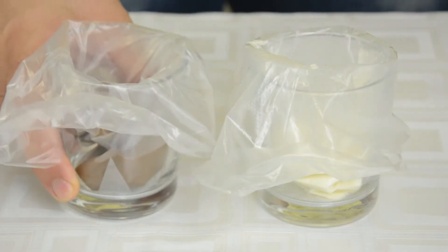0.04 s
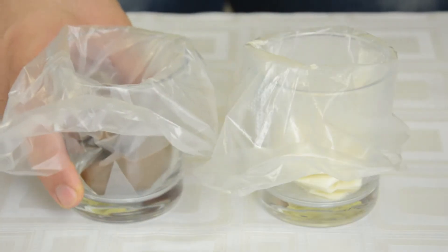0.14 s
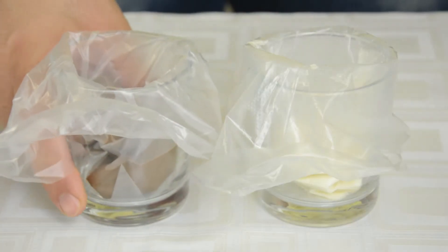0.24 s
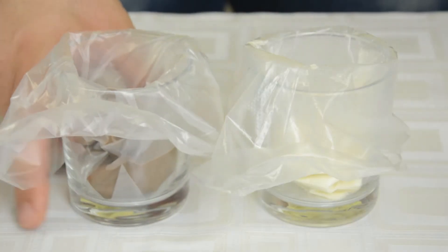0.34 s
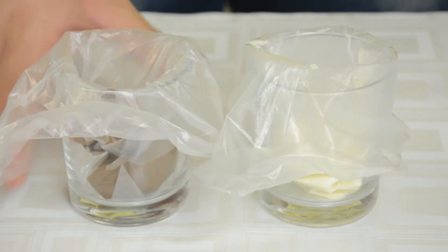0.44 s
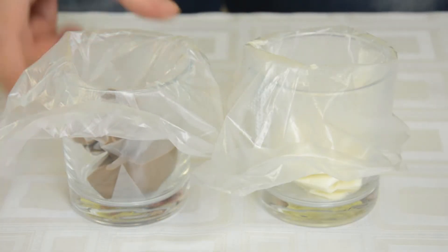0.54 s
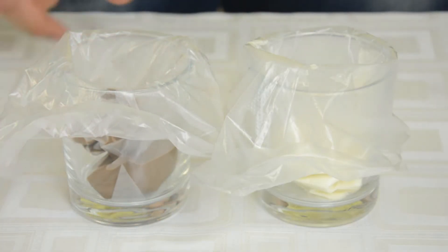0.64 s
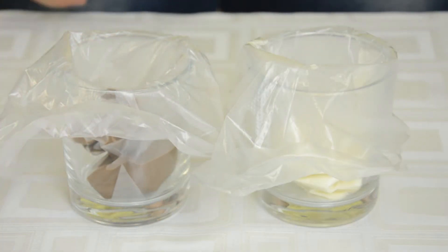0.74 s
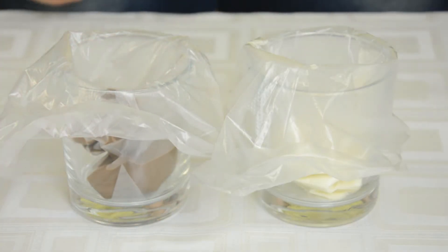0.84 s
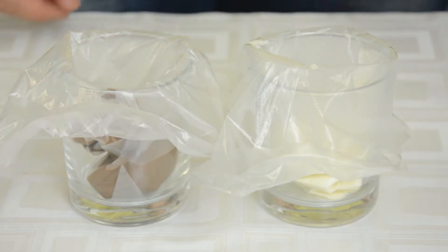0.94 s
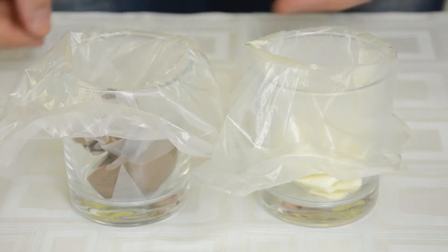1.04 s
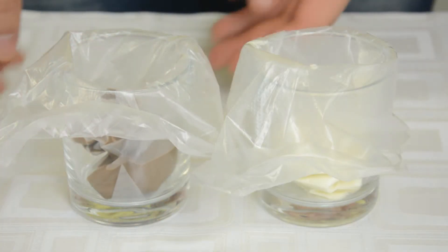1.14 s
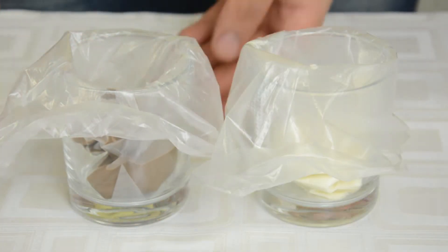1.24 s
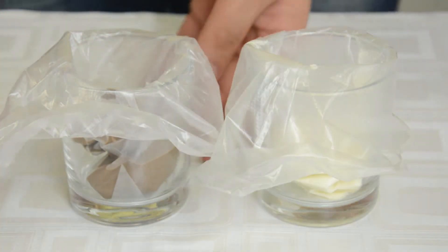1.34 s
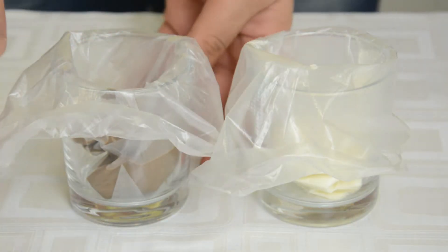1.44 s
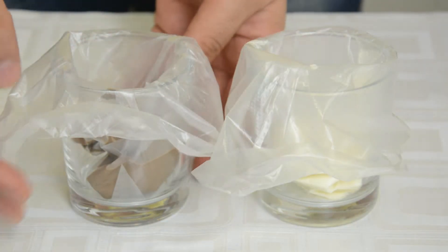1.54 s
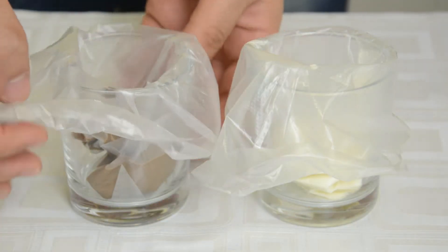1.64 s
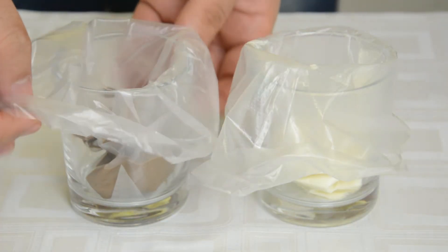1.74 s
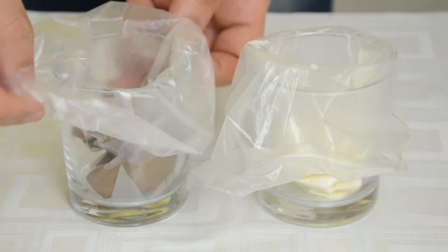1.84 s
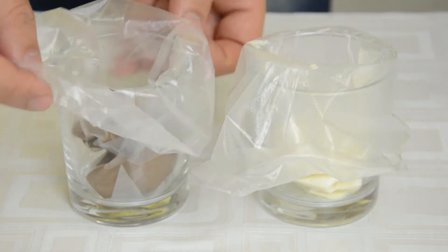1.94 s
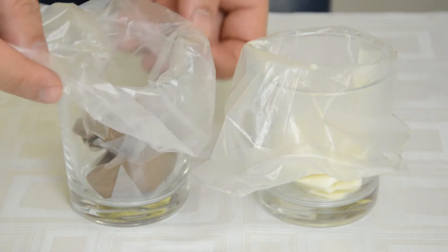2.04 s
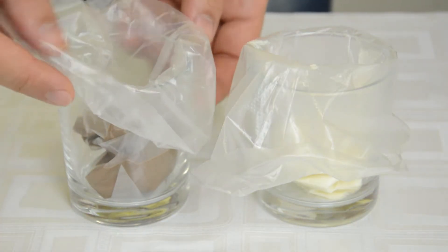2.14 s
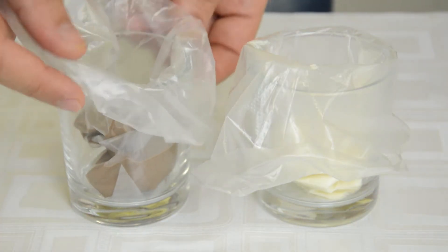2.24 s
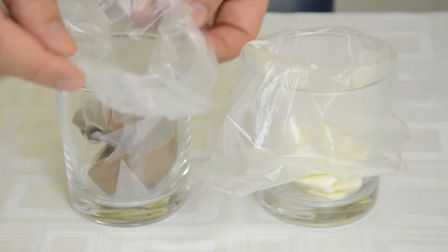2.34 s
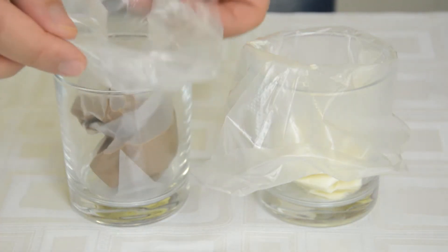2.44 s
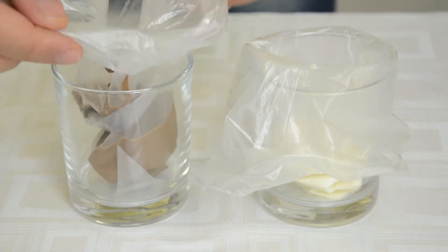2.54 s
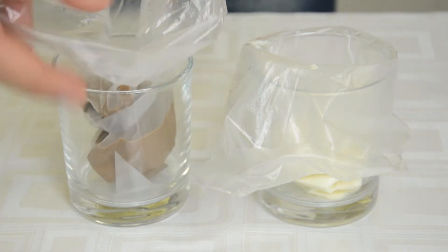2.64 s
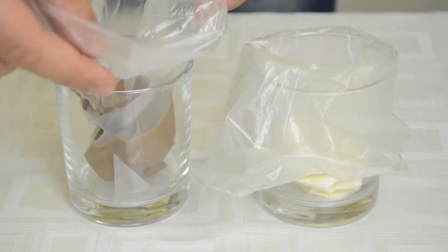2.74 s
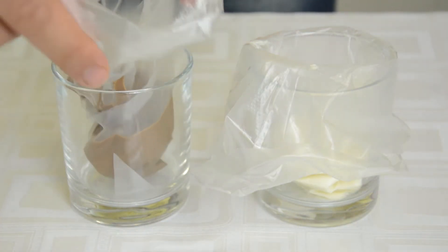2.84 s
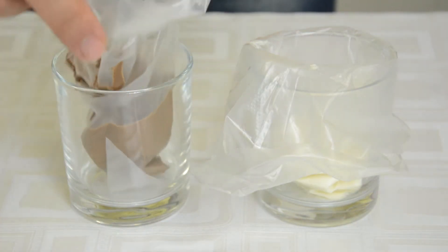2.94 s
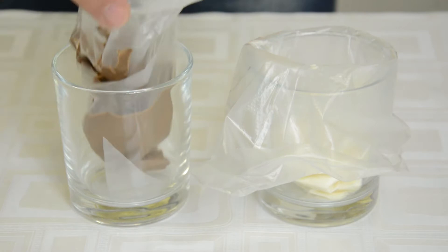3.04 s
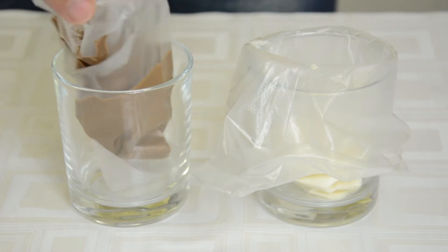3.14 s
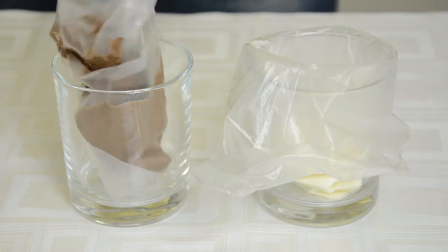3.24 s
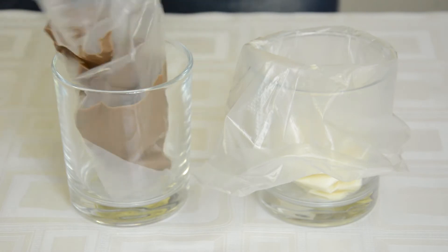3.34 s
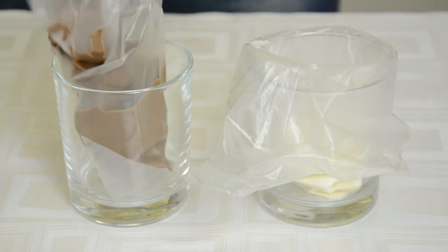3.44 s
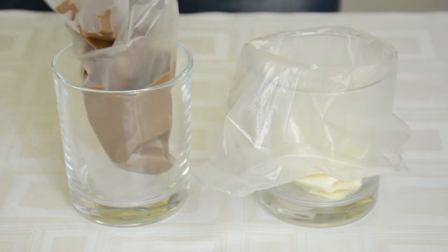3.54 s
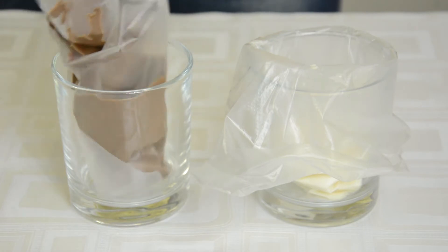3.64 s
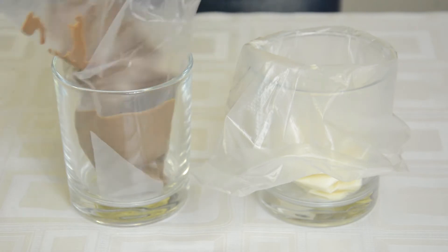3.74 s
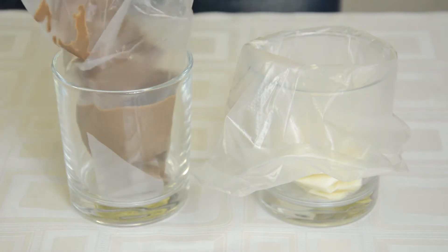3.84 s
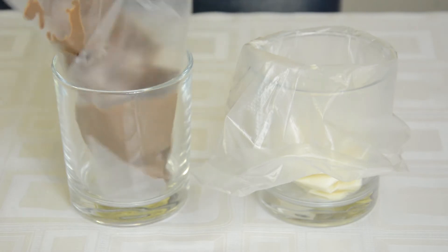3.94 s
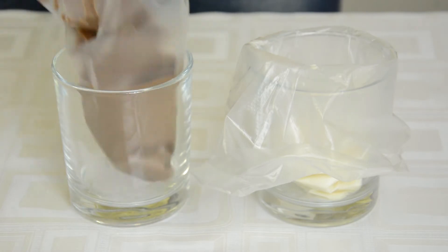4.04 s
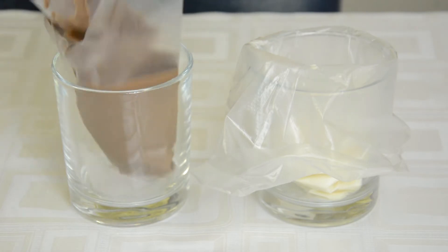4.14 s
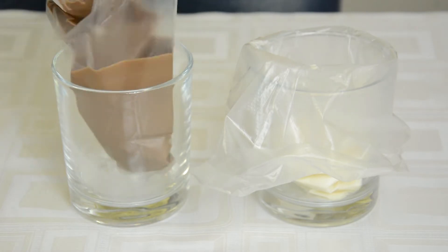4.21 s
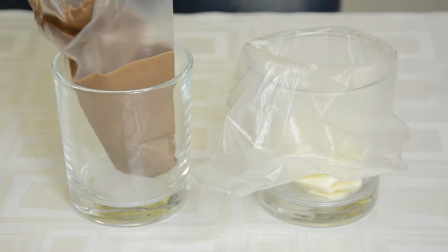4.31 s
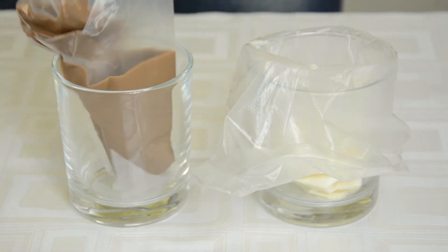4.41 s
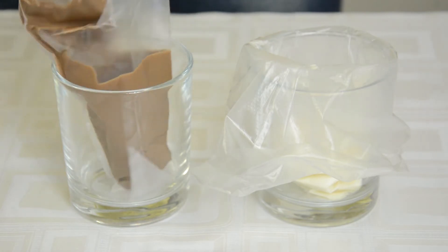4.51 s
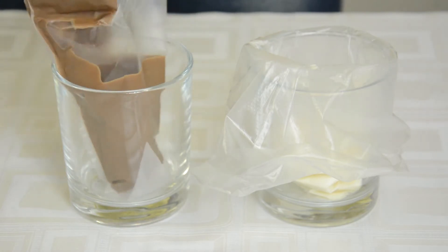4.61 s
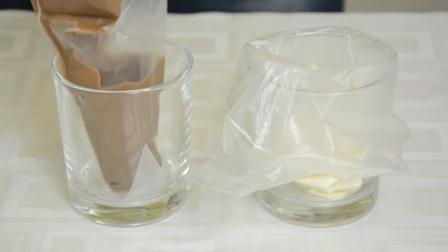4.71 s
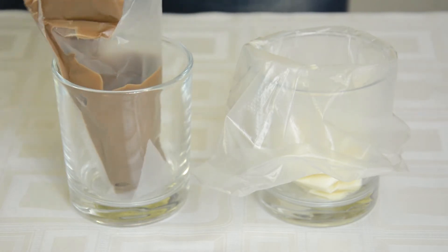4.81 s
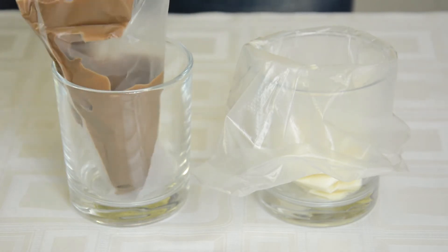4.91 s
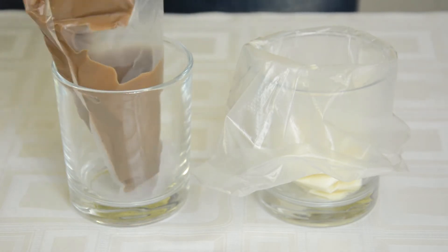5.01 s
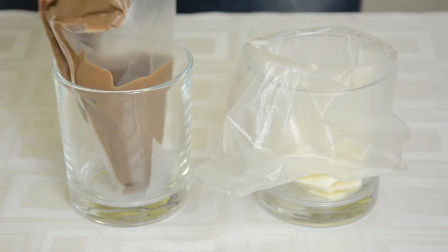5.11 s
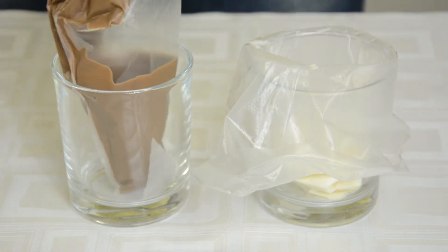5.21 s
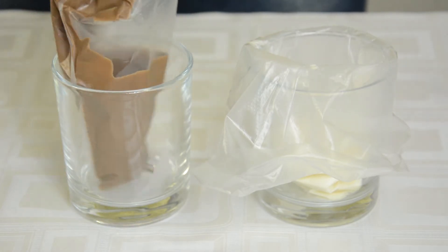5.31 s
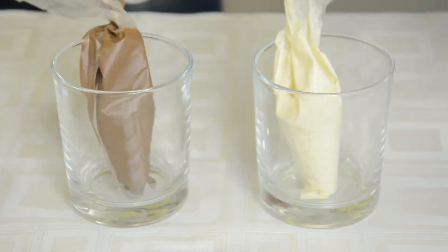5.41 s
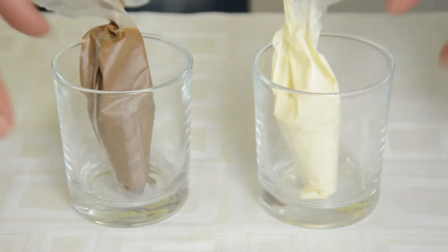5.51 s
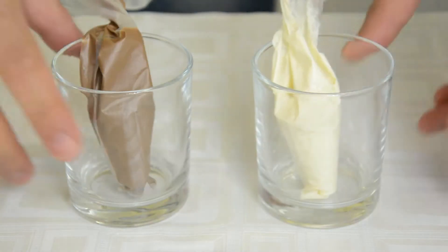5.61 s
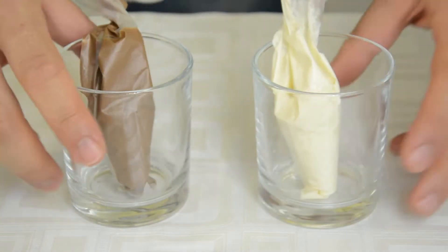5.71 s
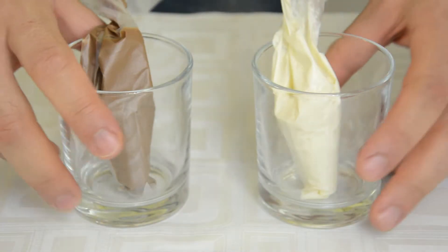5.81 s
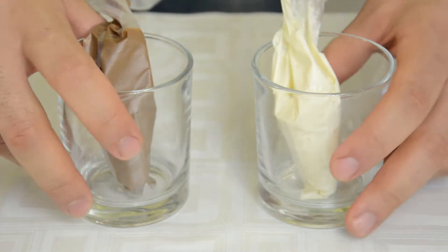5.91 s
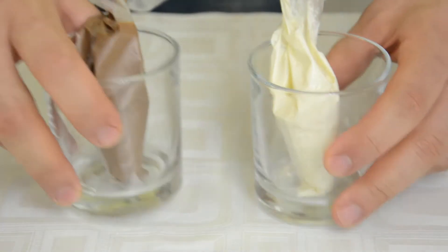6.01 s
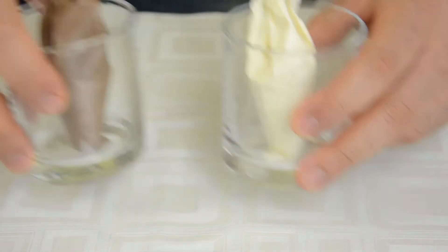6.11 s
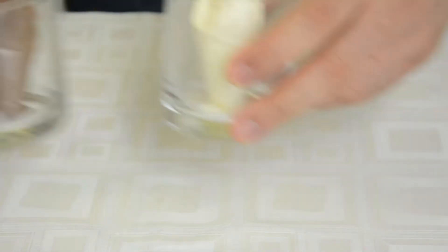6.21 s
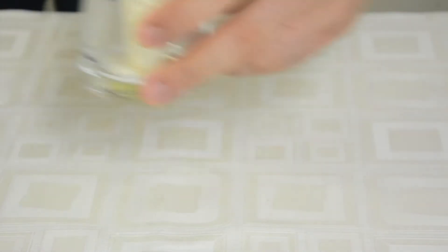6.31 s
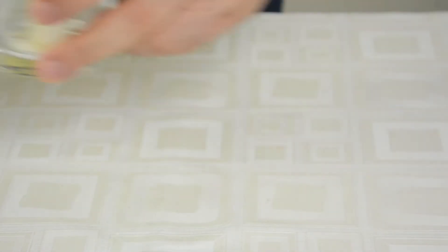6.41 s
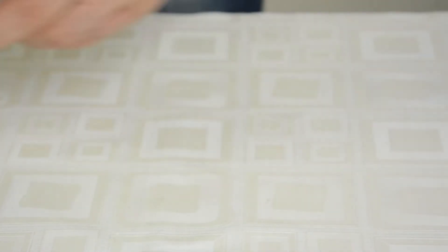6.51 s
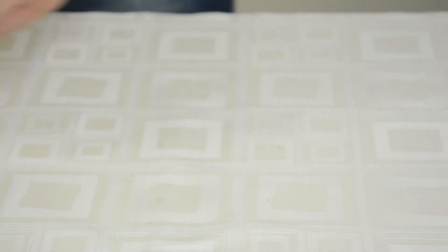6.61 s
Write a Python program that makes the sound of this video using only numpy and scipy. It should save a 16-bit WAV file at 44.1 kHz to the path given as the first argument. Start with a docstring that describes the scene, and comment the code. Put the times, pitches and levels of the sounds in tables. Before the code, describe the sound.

A thick drinking glass is set down on a cloth-covered table with a quick cluster of dull knocks and a brief, damped clink. Fingers rustle thin plastic. After a quiet second, the film is pulled off in tugs, crackling densely with sharp snaps and a slightly hollow glass-like colour. It stops suddenly; a few brushes and a soft thump follow. Close stereo microphone in a quiet kitchen with faint hum.

```python
"""Thin plastic film crinkles densely: clustered buckling clicks, pings and ticks from filtered noise, swelling in tugs.
Larger creases snap through over it as needles and short noise cracks with a note each.
Fingers brush film and glass as grainy noise swishes. Thick drinking glasses meet a clothed table:
modal thuds of the table top and brief modal clinks of the glass wall.
A quiet room of coloured noise and soft hum lies underneath and sinks during the crinkling."""
import sys
import numpy as np
from scipy import signal
from scipy.fft import rfft, irfft
from scipy.io import wavfile
from scipy.ndimage import uniform_filter1d

SR = 44100
rng = np.random.default_rng(int(sys.argv[2]) if len(sys.argv) > 2 else 0)


def master_out(mix):
    """Clip the mix to full scale and print it as 16-bit PCM to the path in sys.argv[1]."""
    frames = np.transpose(np.atleast_2d(mix))
    ceiling = np.clip(frames, -1, 1)
    pcm = np.round(ceiling * 32767).astype(np.int16)
    wavfile.write(sys.argv[1], SR, pcm)


N = 293706
T = np.arange(N) / SR
BAND_TOP_HZ = SR / 2 - 1  # leaves the top open


def undb(db):
    """Decibels to gain."""
    return 10 ** (np.asarray(db) / 20)


def unit(x):
    """Scale to rms 1."""
    return x / np.sqrt(np.mean(x ** 2))


def curve(rows):
    """(time_s, value) rows joined by straight lines."""
    rows = np.array(rows)
    return np.interp(T, rows[:, 0], rows[:, 1])


def add(track, start_s, sound):
    """Mix a sound into a track at start_s."""
    i = max(int(start_s * SR), 0)
    track[..., i:i + sound.shape[-1]] += sound[..., :N - i]


def colour(x, points, size=2048):
    """Minimum-phase filter with the gain of (freq_hz, gain_db) points."""
    freq_hz, gain_db = np.transpose(points)
    f = np.maximum(np.fft.rfftfreq(size, 1 / SR), 1)
    log_gain = np.log(undb(np.interp(np.log(f), np.log(freq_hz), gain_db)))
    # folding the cepstrum onto positive times makes the filter causal
    cepstrum = irfft(log_gain)
    cepstrum[1:size // 2] *= 2
    cepstrum[size // 2 + 1:] = 0
    response = irfft(np.exp(rfft(cepstrum)))
    return signal.fftconvolve(x, response[None], axes=1)[:, :x.shape[1]]


def band(x, lo_hz, hi_hz, order=2):
    """Band-pass filter."""
    sos = signal.butter(order, [lo_hz, hi_hz], "band", fs=SR, output="sos")
    return signal.sosfilt(sos, x)


def fade(t, t60_s):
    """Exponential decay, 60 dB down at t60_s."""
    return np.exp(-np.log(1000) * t / t60_s)


def noise(size):
    """White mid and side noise."""
    return rng.standard_normal((2, size))


def resonance(freq_hz, width_hz):
    """Mid and side noise in one narrow resonance, rms 1."""
    return unit(band(noise(N), freq_hz - width_hz / 2, freq_hz + width_hz / 2, order=1))


def hiss(spectrum, tilt_db_per_oct, size):
    """Mid and side noise of rms 1 with a spectrum tilted about 1 kHz."""
    tilted = [(hz, db + tilt_db_per_oct * np.log2(hz / 1000)) for hz, db in spectrum]
    return unit(colour(noise(size), tilted))


def ring(modes, size=22050):
    """Struck body: a sum of decaying sine modes."""
    t = T[:size]
    return sum(undb(db) * fade(t, t60_s) * np.sin(2 * np.pi * hz * t) for hz, db, t60_s in modes)


def reflect(x, wet_db, t60_s, gap_s):
    """The sound plus a diffuse tail of reflections that starts after gap_s."""
    t = T[:SR // 2]
    tail = noise(len(t)) * fade(t, t60_s) * (t > gap_s)
    tail /= np.sqrt(np.sum(tail ** 2, axis=1, keepdims=True))
    return x + undb(wet_db) * signal.fftconvolve(x, tail, axes=1)[:, :N]


def wander(rate_hz):
    """Smooth random motion with rms 1."""
    hold = int(SR / rate_hz)
    steps = np.repeat(rng.standard_normal(N // hold + 1), hold)
    return unit(uniform_filter1d(steps, hold)[:N])


def with_note(sound, note_hz, note_db, width_ratio=0.13):
    """Let one broad resonance of the sheet stand out of a noise; rms 1."""
    edge = 1 + width_ratio / 2
    note = unit(band(sound, note_hz / edge, note_hz * edge, order=1))
    return unit(sound + undb(note_db) * note)


# room noise spectrum, shape only: freq_hz [Hz], density_db [dB per Hz]
ROOM_SPECTRUM = [(18, -46), (30, -23), (48, -21.5), (161, -6), (328, -6.5), (461, -13), (499, -7),
                 (649, -5.5), (740, -6.5), (1160, -8), (2170, -15), (2480, -16), (3140, -17), (7270, -21),
                 (16000, -24)]
# room level before the noise trim: time_s [s], level_db [dB]
ROOM_LEVEL = [(0, -54.5), (.6, -57), (1.36, -55), (1.55, -60.5), (1.72, -68), (5.3, -68), (5.45, -54.5),
              (5.8, -54), (6.2, -56.5), (6.66, -55.5)]
# appliance hum: freq_hz [Hz], width_hz [Hz], level_db [dB re room level]
HUM = [(109, 3.4, -23), (160.7, 8.7, -15.5), (347, 2.6, -15.5), (457, 35, -12), (768, 5.9, -16),
       (1163, 8.9, -16.5)]


def room():
    """Kitchen air and microphone hiss as coloured noise; appliance hum as narrow noise resonances."""
    hum = sum(undb(db) * band(resonance(hz, width_hz), hz / 2, hz * 2) for hz, width_hz, db in HUM)
    air = undb(-2.5) * hiss(ROOM_SPECTRUM, 0, N)
    return (air + hum) * undb(curve(ROOM_LEVEL))


# glass meets table: start_s [s], level_db [dB before trims], contact_s [s, softness]
THUDS = [(.001, -41, 0.0011), (.031, -39, 0.0013), (.2075, -25, 0.00044), (.2118, -24, 0.00024),
         (.2172, -30, 0.0013), (.2335, -35, 0.00018), (.2432, -31.5, 0.00071), (.2565, -39, .0003),
         (5.738, -36, 0.00077), (5.752, -50, .0009), (5.773, -49, 0.00073), (6.023, -47, 0.00094),
         (6.311, -60, 0.00055)]
# table top modes under the cloth: freq_hz [Hz], level_db [dB], t60_s [s]
TABLE_MODES = [(210, -11, 0.19), (242, -17.5, 0.29), (370.4, -4, 0.19), (413, -1.5, 0.1), (465, -4, 0.068),
               (537.4, 1, 0.12), (620, -29, 0.13), (757, -10, 0.095), (868, -5, 0.073), (914, -10.5, 0.17),
               (1108, -12, .13), (1280, -20, 0.12), (1760, -11, 0.053)]


def thuds(size=22050):
    """The heavy base thumps the table through the cloth: a soft push excites the table modes."""
    out, t = np.zeros((2, N)), T[:size]
    table = ring(TABLE_MODES)
    for start_s, level_db, contact_s in THUDS:
        push = np.hanning(int(contact_s * SR) + 3)
        thump = np.convolve(table, push / push.sum())
        add(out[0], start_s, undb(level_db - 8.0) * thump)
        # the kitchen answers with a dull tail
        tail = unit(band(noise(size), 165, 770)) * fade(t, 0.51) * np.minimum(t / 0.0033, 1)
        add(out, start_s, undb(level_db - 17.5) * tail)
    return band(out, 266, 4800)  # a small board radiates little bass


# light touches of glass on glass: start_s [s], level_db [dB], stop_s [s, hand and cloth begin to damp]
CLINKS = [(.001, -60, .06), (0.031, -68, .09), (.214, -46, 0.26), (0.2207, -48, 0.24), (0.2299, -46, 0.255),
          (.2395, -53, .255)]
# glass wall modes, varied per touch: freq_hz [Hz], level_db [dB], t60_s [s]
GLASS_MODES = [(2860, -15, .2), (3915, 0, .18), (3985, -2, .11), (5320, -3.5, 0.18), (5420, -1.5, .17),
               (5685, -9, .14), (6223, -14, .14), (7030, -5.5, .21), (7615, -15, .16), (8850, -12, .2)]


def clinks(size=22050, damped_t60_s=0.095):
    """The glass wall rings in its modes with a contact noise until the hand and cloth damp it."""
    out, t = np.zeros((2, N)), T[:size]
    for start_s, level_db, stop_s in CLINKS:
        contact = undb(-5) * unit(band(noise(size), 1500, 8900)) * fade(t, 0.15)
        # each touch lands elsewhere on the wall and favours other modes
        variation = rng.standard_normal((len(GLASS_MODES), 2))
        modes = [(hz * (1 + 0.004 * detune), db + gain_db, t60_s)
                 for (hz, db, t60_s), (detune, gain_db) in zip(GLASS_MODES, variation)]
        damping = fade(np.maximum(start_s + t - stop_s, 0), damped_t60_s)
        clink = np.outer([1, 0.6], ring(modes)) + contact
        add(out, start_s, undb(level_db) * clink * damping)
    return out


# finger noise spectrum, shape only: freq_hz [Hz], density_db [dB per Hz]
FINGER_SPECTRUM = [(80, -51), (170, -7.5), (450, 3.5), (1100, 5), (2500, 5.5), (5500, 2.5), (9000, -1.5),
                   (16000, -7.5)]
# fingers over film and glass: peak_s [s], level_db [dB before reflections], rise_s [s], t60_s [s],
# tilt_db_per_oct [dB/octave], note_hz [Hz, fold], note_db [dB re noise]
BRUSHES = [(.271, -45.5, 0.01, 1, -0.5, 920, -11), (.389, -43.5, 0.03, 0.48, 1, 7200, -16),
           (0.4356, -36, 0.0034, 0.15, -1, 5170, -6), (.449, -45, 0.0068, 0.22, -2, 1005, 11),
           (1.037, -54.5, 0.0038, 0.26, 2, 7140, -9), (1.316, -52, 0.0047, 0.28, -2.5, 2400, -20),
           (1.366, -59.5, 0.032, 0.44, -3, 3370, -1), (1.451, -61.5, 0.027, .21, -5, 3960, -3),
           (5.53, -39.5, 0.034, 0.36, 1, 3320, -34), (5.555, -37.5, 0.0056, 0.16, -2.5, 2000, -7),
           (5.592, -36.5, 0.0096, 0.13, -3, 1010, -6), (5.737, -53, .003, .08, 10, 3000, -7),
           (5.815, -57, 0.0024, .1, 3, 2584, 4), (5.925, -57.5, 0.005, 0.081, -2.5, 2300, -11),
           (5.987, -51, 0.0067, 0.12, -3.5, 1820, -6), (6.025, -62, 0.0048, .21, -5, 1300, -12),
           (6.312, -54.5, 0.0032, .14, -5, 1390, -4)]


def brushes(size=20000):
    """Skin drags over loose film: a grainy swish, coloured by the fold it moves, swells and dies away in the room."""
    out, t = np.zeros((2, N)), T[:size]
    for peak_s, level_db, rise_s, t60_s, tilt_db_per_oct, note_hz, note_db in BRUSHES:
        shape = np.minimum(t / rise_s, 1) * fade(np.maximum(t - rise_s, 0), t60_s)
        swish = with_note(hiss(FINGER_SPECTRUM, tilt_db_per_oct, size), note_hz, note_db)
        add(out, peak_s - rise_s, undb(level_db) * shape * swish)
    grain = unit(undb(2.2 * wander(1200) + 1.8 * wander(250)))
    return reflect(band(out * grain, 190, 17500), wet_db=-6.0, t60_s=0.24, gap_s=0.013)


# film spectrum, shape only; also colours gathering(): freq_hz [Hz], density_db [dB per Hz]
FILM_SPECTRUM = [(60, -31), (100, -43.5), (280, -20), (420, -5), (600, -11.5), (1000, -5.5), (1300, -2),
                 (1830, -1.5), (3200, -2), (4600, -3.5), (10000, -3), (16000, -9.5)]
# single creases snapping through: start_s [s], level_db [dB before trim], tilt_db_per_oct [dB/octave],
# note_hz [Hz, facet], note_db [dB re noise]
SNAPS = [(0.2578, -23, -2, 2140, -12), (0.2657, -35, 4, 6000, -2), (0.305, -36, 2, 5500, 9),
         (0.328, -34, 1, 930, 2), (.367, -33, -3, 9700, -3), (.383, -37, 0, 5900, -3),
         (0.4316, -29, -3, 8000, -11), (.4362, -28, 0.5, 6950, -9), (0.44, -29, -2, 5200, -2),
         (0.45, -32, -3, 4000, -1), (0.459, -37, 0, 5500, -4), (1.031, -38, 2, 2080, -9),
         (1.033, -39.5, -5, 7600, 2), (1.5592, -39, -2.5, 5600, -10), (1.61, -34, 0, 1300, -2),
         (1.6418, -32.5, -1, 12000, -5), (1.6746, -31, 0.5, 9000, -6), (1.682, -35, 3, 9000, -10),
         (1.697, -35, 0, 8000, -6), (1.717, -34, 0, 1290, -1), (1.74, -37, -2, 11000, -8),
         (1.811, -36, 0, 9000, -11), (1.8315, -34, 4, 10900, 0), (1.8834, -30.5, -3, 3680, 14),
         (1.907, -33, -1, 10200, -11), (1.9237, -32, -4, 3630, -3), (1.975, -30, 9, 12900, -3),
         (1.987, -26.5, -4.5, 2300, 2), (1.9895, -28, 5, 2350, -1), (2.05, -36, -7, 6000, -11),
         (2.062, -32, 0, 3000, -17), (2.1388, -32, -0.5, 3300, -18), (2.17, -31, 2, 3380, -9),
         (2.201, -35, -9, 3500, 4), (2.253, -33, 6, 8800, -2), (2.2903, -28, 2, 14000, -4),
         (2.3802, -35, 1, 7000, -6), (2.411, -41, 8, 12100, -2), (2.4468, -35, 7, 5000, -6),
         (2.458, -37, 6, 8000, -6), (2.49, -37, -3, 2980, -8), (2.569, -35, -1, 6000, -14),
         (2.615, -38, -2, 2800, -8), (2.6585, -34, -8, 5000, -15), (2.711, -36, 4, 8900, -1),
         (2.719, -33, 1, 2600, -5), (2.757, -30, 4, 8040, -2), (2.925, -29, 3, 11700, -9),
         (2.994, -32, -4, 3000, -14), (3.137, -33, -3, 3000, 0), (3.186, -31, 5, 11000, -8),
         (3.2047, -30, 4, 10000, -5), (3.247, -34, 4, 11000, -5), (3.298, -30, -4.5, 4000, -6),
         (3.312, -30, -3, 3500, -10), (3.35, -28, 3, 5640, -8), (3.375, -36, -6, 3000, -2),
         (3.3976, -27, 0, 2500, 3), (3.421, -35, 0, 8000, -4), (3.495, -34, -5.5, 12000, -4),
         (3.53, -32, 5, 6000, -6), (3.585, -34.5, -2, 7000, -2), (3.608, -27.5, -3.5, 3000, -10),
         (3.6208, -27, 2, 7500, -13), (3.635, -32, -4, 12000, -5), (3.6843, -35, 6, 7500, -5),
         (3.735, -33, -6, 12000, -6), (3.743, -29, -5, 9000, -6), (3.825, -32, 3, 6600, -3),
         (3.855, -26.5, -1, 2400, -1), (3.9234, -25.5, 2, 5060, -18), (3.934, -20.5, -3.5, 1300, 3),
         (3.964, -37, -.5, 3000, -15), (4.0023, -24, -4, 7860, 0), (4.0775, -39, 3, 8000, -6),
         (4.148, -28, 4, 7050, -8), (4.2548, -40, 0, 1600, 0), (4.319, -30.5, -3, 6840, -5),
         (4.423, -32.5, 9, 3600, 2), (4.495, -40, 3, 6000, -13), (4.5032, -40, -3, 9000, -8),
         (4.615, -28.5, -2, 3170, 8), (4.6545, -37, -5, 5000, -3), (4.692, -34, 1, 2700, -3),
         (4.7758, -26, -1, 1650, 8), (4.8026, -20, .5, 10800, -11), (4.807, -23.5, 2, 4000, -10),
         (4.8115, -28, 4, 1600, -2), (4.861, -29.5, 5, 3450, 2), (5.038, -30, -3, 6200, 4),
         (5.144, -33, -4, 1600, -1), (5.198, -33, 5, 5000, -8), (5.212, -33, -1, 7000, 0),
         (5.2328, -29.5, 0, 8000, -5), (5.2532, -28.5, -3.5, 3350, 3), (5.261, -30.5, 0.5, 3450, 2),
         (5.2793, -31, 0, 2530, 14), (5.3212, -28, -2.5, 7600, -1), (5.347, -33, -2, 2200, -4),
         (5.4022, -45, 2, 6000, -8), (5.418, -40, 11, 2000, -2), (5.425, -44, 7, 13000, 2),
         (5.502, -33, 0, 7400, -9), (5.51, -31, 2, 2680, 2), (5.5164, -23, 3, 9800, -12),
         (5.535, -28, 1, 7000, -3), (5.55, -26, 9, 9100, -3), (5.5822, -28, 10, 8500, -7),
         (5.5919, -29, -5, 1000, -9), (5.615, -43, 1, 1100, -2), (5.815, -49, -1, 2600, 2),
         (5.9235, -51, -6, 2300, 0), (5.9874, -46, -5, 1800, -2)]


def snaps(size=6000):
    """A larger crease flips over: a bright needle, a short crack on the facet's note, then the sheet flutters."""
    out, t = np.zeros((2, N)), T[:size]
    hold_s, crack_t60_s, needle_t60_s = 0.0005, 0.016, 0.0014
    running = fade(np.maximum(t - hold_s, 0), crack_t60_s)
    flutter = undb(-17) * fade(t, 0.13)
    for start_s, level_db, tilt_db_per_oct, note_hz, note_db in SNAPS:
        facet = with_note(hiss(FILM_SPECTRUM, tilt_db_per_oct, size), note_hz, note_db)
        crack = facet * np.hypot(running, flutter)
        needle = undb(5) * hiss(FILM_SPECTRUM, tilt_db_per_oct + 2, size) * fade(t, needle_t60_s)
        add(out, start_s, undb(level_db - 6.0) * (crack + needle))
    return band(out, 326, BAND_TOP_HZ, order=3)  # a light sheet moves too little air for bass


def creases(per_s, size_db, own_db, cluster_db, cluster_hz, drift_db, crack_t60_s, flutter_t60_s, flutter_db,
            count=13):
    """Tiny buckling clicks in clusters: each is a crack and a short flutter of the sheet, with its own colour."""
    at = np.flatnonzero(rng.random(N) < per_s / SR)

    def spread():
        return np.minimum(rng.standard_normal(len(at)), 2)

    strength_db = size_db * spread() + cluster_db * wander(cluster_hz)[at]
    edges_hz = np.r_[60, np.geomspace(500, 18000, count)]
    t, out = T[:4000], 0
    for lo_hz, hi_hz in zip(edges_hz, edges_hz[1:]):
        energy = np.zeros(N)
        energy[at] = undb(strength_db + own_db * spread()) ** 2
        # low notes of the sheet take longer to die than the treble
        crack = fade(t, crack_t60_s * np.sqrt(edges_hz[-1] / hi_hz))
        flutter = undb(flutter_db) * fade(t, flutter_t60_s)
        power = np.abs(signal.oaconvolve(energy, crack ** 2 + flutter ** 2)[:N])
        envelope = np.sqrt(power) * undb(drift_db * wander(25))
        out = out + band(unit(envelope) * noise(N), lo_hz, hi_hz)
    return unit(out)


def reshape(x, depth_db, t60_s, rate_hz, count=4):
    """The sheet keeps changing shape, so its fine resonances glide from one set to another."""
    t, out = T[:2048], x
    for _ in range(count):
        response = rng.standard_normal(len(t)) * fade(t, t60_s)
        response /= np.sqrt(count * np.sum(response ** 2))
        resonant = signal.oaconvolve(x, response[None], axes=1)[:, :N]
        out = out + undb(depth_db) * np.tanh(wander(rate_hz)) * resonant
    return out


def pings(per_s, size_db, lo_hz, hi_hz, cycles):
    """Small facets flip and ring, each at its own pitch, 60 dB down after the given cycles; rms 1."""
    out, t = np.zeros((2, N)), T[:1100]
    for when, pitch, size, side in rng.random((int(per_s * N / SR), 4)):
        pitch_hz = lo_hz * (hi_hz / lo_hz) ** pitch
        gain = undb(size_db * size ** 2) * np.sqrt(pitch_hz)
        ping = gain * fade(t, cycles / pitch_hz) * np.sin(2 * np.pi * pitch_hz * t)
        add(out, when * N / SR, np.outer([1, np.sqrt(3) * (2 * side - 1)], ping))
    return unit(out)


def ticks(per_s, size_db, t60_s):
    """The tiniest kinks give lone, needle-sharp ticks; rms 1."""
    sizes = (rng.random(N) < per_s / SR) * undb(size_db * rng.random(N))
    envelope = signal.oaconvolve(sizes, fade(T[:512], t60_s))[:N]
    return unit(band(envelope * noise(N), 4300, 14000, order=1))


def bursts(per_s=420, spread_db=13, t60_s=0.004, share=0.34):
    """Stick and slip of the film: a gain of short uneven bursts at random intervals; rms 1."""
    gap, size = rng.random((2 * int(per_s * N / SR), 2)).T
    at = (np.cumsum(-np.log1p(-gap) / per_s) * SR).astype(int)
    energy = np.bincount(at, undb(spread_db * size) ** 2, N)[:N]
    shape = fade(T[:SR // 20], t60_s)
    power = np.abs(signal.oaconvolve(energy, shape ** 2)[:N])
    return np.sqrt(1 - share + share * power / power.mean())


def tug(peak_s, rise_s, t60_s):
    """Envelope of one tug: crinkling builds as the film is pulled and dies away as it slackens."""
    return np.clip(1 + (T - peak_s) / rise_s, 0, 1) * fade(np.maximum(T - peak_s, 0), t60_s)


# film sliding between tugs: time_s [s], level_db [dB before trims], hollow_db [dB re level]
SLIDE = [(1.56, -59, -9), (1.7, -49.5, 0), (2.1, -53.5, -4), (2.45, -57.5, 10), (2.62, -61.5, 3),
         (2.76, -46, -9.5), (3.68, -53.5, -8), (4.25, -47, -16), (4.55, -48, -6), (5.15, -46.5, -7),
         (5.43, -52.5, -5)]
# tugs at the film: peak_s [s], level_db [dB before trims], rise_s [s], t60_s [s],
# folds_db [dB re level], hollow_db [dB re level]
TUGS = [(1.752, -41, 0.013, 0.4, -1.5, -15), (1.83, -46, 0.073, 0.21, -7, 6.5),
        (1.99, -44.5, 0.049, 0.63, 0, 0), (2.2, -46.5, 0.085, 0.36, -1.5, 6),
        (2.29, -42.5, 0.066, 1.02, -2.5, -4), (2.5, -45, 0.02, 0.59, -2, -1),
        (2.635, -45, 0.028, 0.38, -3, -17), (2.98, -45, 0.18, 0.84, -0.5, -5),
        (3.16, -39, 0.052, 0.36, -0.5, -22), (3.272, -38.5, 0.048, 0.41, -2.5, -20),
        (3.385, -41, 0.049, 0.43, 2, -17), (3.5, -41.5, 0.051, 1.45, -0.5, -16),
        (3.746, -35, 0.029, 0.5, -1, -22), (3.825, -43, 0.015, 0.58, 1, 3),
        (3.975, -37.5, 0.051, 0.5, -1.5, -1.5), (4.43, -45, 0.022, 0.46, 3.5, -18),
        (4.614, -40.5, 0.04, 0.18, -1.5, -26), (4.695, -42.5, 0.044, 0.38, -1, -15),
        (4.83, -41, 0.13, 0.63, -1, -1.5), (4.995, -41, 0.021, 0.53, -2.5, -20),
        (5.11, -40.5, 0.1, 0.41, -4.5, -4), (5.26, -42, 0.11, 0.24, -15, -23)]


def handling(slide_folds_db=-0.5):
    """Gains of fine crinkle, broad folds and hollow note: sliding and tugs add in power."""
    slide_db = curve([(time_s, level_db) for time_s, level_db, _ in SLIDE])
    slide_hollow_db = curve([(time_s, hollow_db) for time_s, _, hollow_db in SLIDE])
    power = undb([slide_db, slide_db + slide_folds_db, slide_db + slide_hollow_db]) ** 2
    for peak_s, level_db, rise_s, t60_s, folds_db, hollow_db in TUGS:
        pull = undb(level_db) * tug(peak_s, rise_s, t60_s)
        power += np.outer(undb([0, folds_db, hollow_db]) ** 2, pull ** 2)
    handled = (T > SLIDE[0][0]) & (T < SLIDE[-1][0])
    return np.sqrt(power) * handled


# air resonances inside the glass: freq_hz [Hz], width_hz [Hz], level_db [dB, relative]
CAVITY = [(1007, 64, 5.5), (1310, 61, -0.5), (1860, 59, -1), (2080, 77, -10), (2870, 21, -34)]


def cavity(clicks):
    """The clicks ring the air inside the glass; rms 1."""
    hollow = sum(undb(db) * band(clicks, hz - width_hz / 2, hz + width_hz / 2, order=1)
                 for hz, width_hz, db in CAVITY)
    return unit(band(hollow, 500, 2400))


def gathering():
    """The film crumples in bursts of clicks, pings and ticks; broad folds add midrange and ring the air in the glass."""
    clicks = creases(per_s=1000, size_db=2.0, own_db=2.5, cluster_db=-0.77, cluster_hz=110, drift_db=1.17,
                     crack_t60_s=0.00054, flutter_t60_s=0.26, flutter_db=-11.5)
    film = reshape(colour(clicks, FILM_SPECTRUM), depth_db=-6, t60_s=0.03, rate_hz=25)
    # zero-phase split, so film - folds is the treble
    folds = signal.sosfiltfilt(signal.butter(2, 3200, fs=SR, output="sos"), film)
    facets = band(pings(per_s=420, size_db=14, lo_hz=1800, hi_hz=15500, cycles=42), 1500, 18000)
    kinks = ticks(per_s=170, size_db=15.0, t60_s=0.001)
    slip = bursts()
    fine = unit((film - folds) * slip) + undb(-6.5) * kinks + undb(-6.5) * facets
    fine_gain, folds_gain, hollow_gain = handling()
    crinkle = unit(fine) * fine_gain * undb(0.68)
    crinkle += unit(folds * np.sqrt(slip)) * folds_gain * undb(-1.17)
    return band(crinkle, 180, BAND_TOP_HZ) + cavity(clicks) * hollow_gain * undb(-9.0)


def ports(mid_side, width):
    """Left and right microphone ports from mid and side, with a side gain for each frequency."""
    mid, side = mid_side[0], colour(mid_side[1:], width)[0]
    return np.array([mid + side, mid - side])


# stereo width of the near sounds: freq_hz [Hz], side_gain_db [dB]
NEAR_WIDTH = [(60, -32), (380, -44), (1300, -85), (2400, -28.5), (4400, -10.5), (8100, -9), (15000, -3)]
# stereo width of the room: freq_hz [Hz], side_gain_db [dB]
ROOM_WIDTH = [(60, -20), (200, -18.5), (700, -8.5), (1300, -9.5), (2400, -1.5), (4400, -0.5), (15000, -0.5)]


def scene():
    """The glasses are straight ahead, so the close ports differ mainly in the treble; the room hiss is wide."""
    near = thuds() + clinks() + brushes() + snaps() + gathering()
    return ports(room(), ROOM_WIDTH) + ports(near, NEAR_WIDTH)


def record(dry):
    """Steep elliptic low-pass at 16 kHz."""
    return signal.sosfilt(signal.ellip(10, 0.1, 70, 16000, fs=SR, output="sos"), dry)


dry = scene()
out = record(dry)
master_out(out)
```